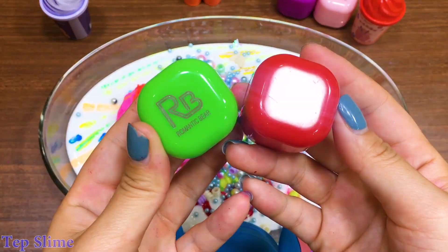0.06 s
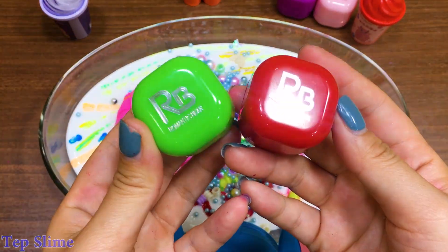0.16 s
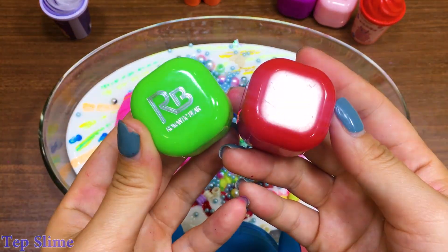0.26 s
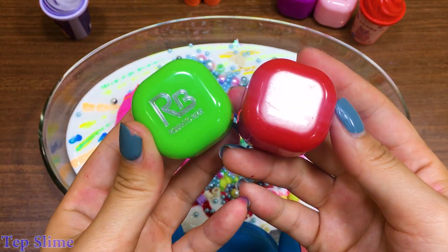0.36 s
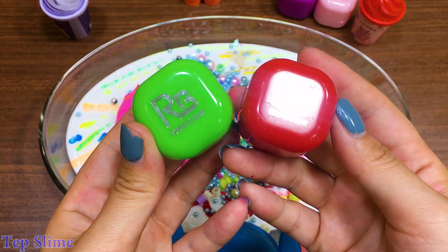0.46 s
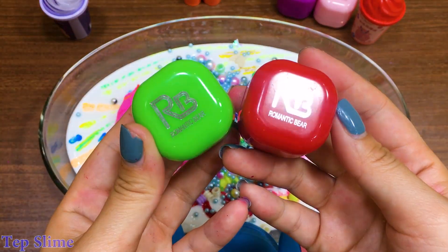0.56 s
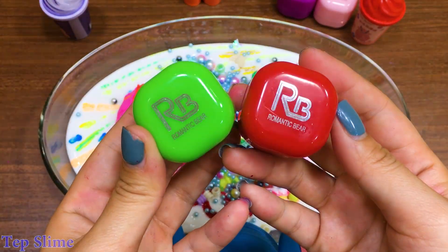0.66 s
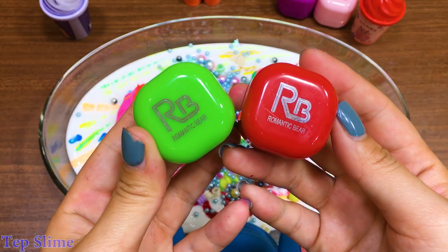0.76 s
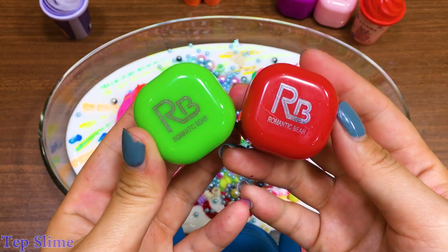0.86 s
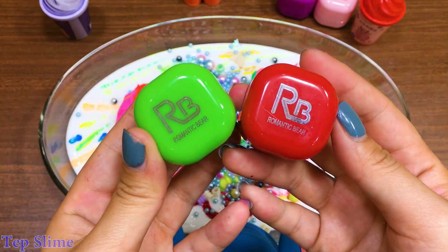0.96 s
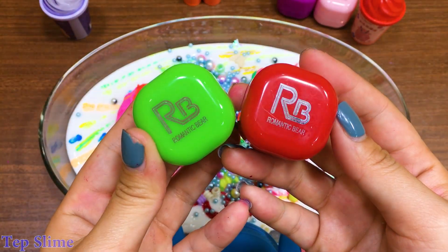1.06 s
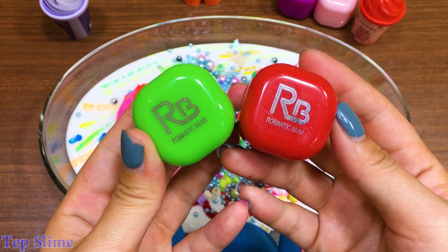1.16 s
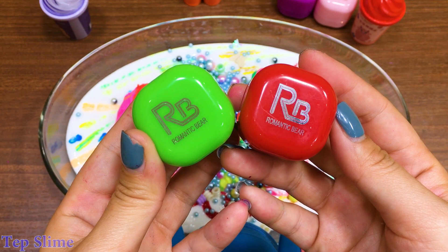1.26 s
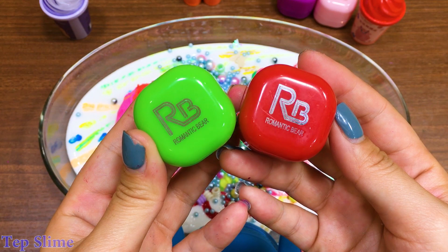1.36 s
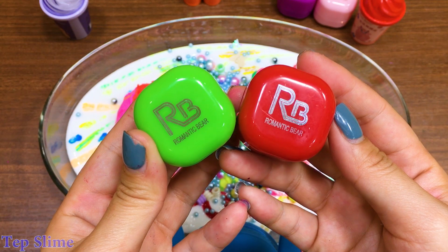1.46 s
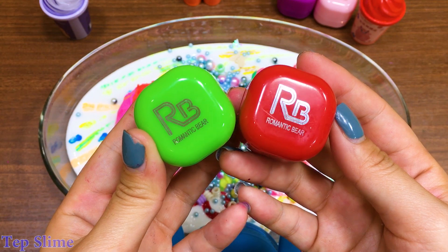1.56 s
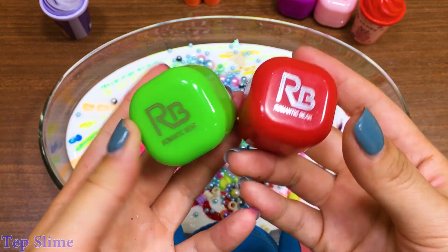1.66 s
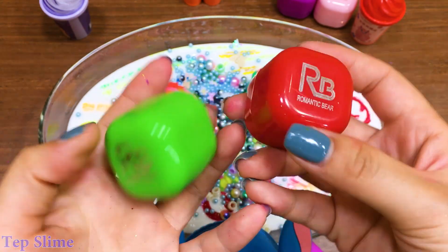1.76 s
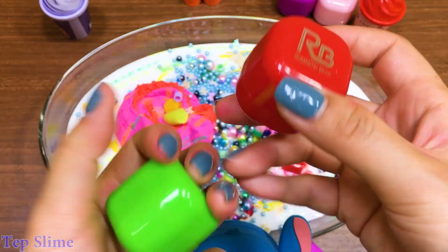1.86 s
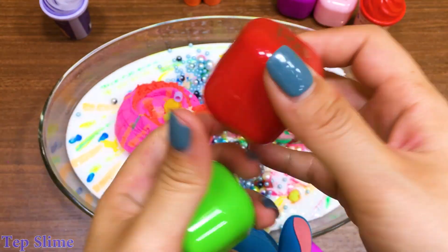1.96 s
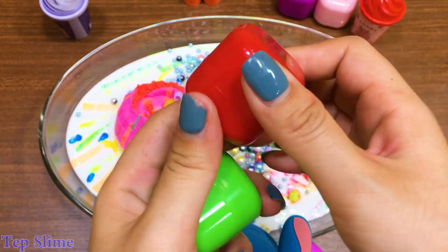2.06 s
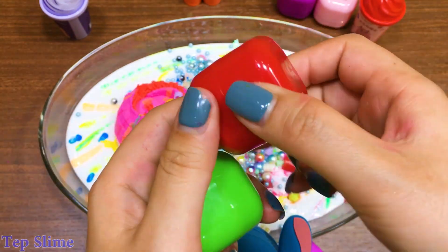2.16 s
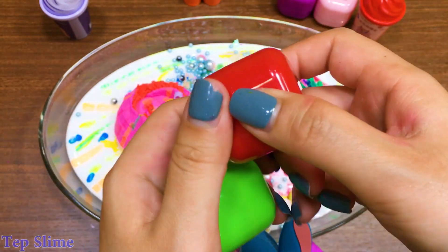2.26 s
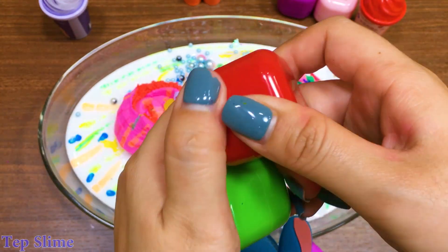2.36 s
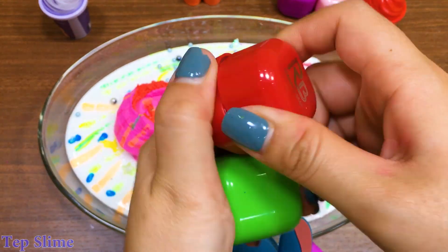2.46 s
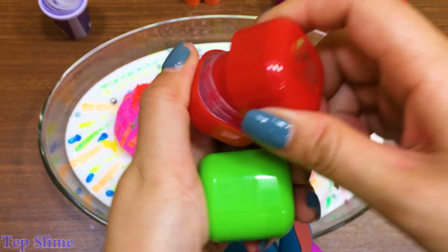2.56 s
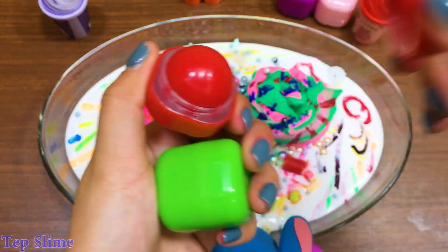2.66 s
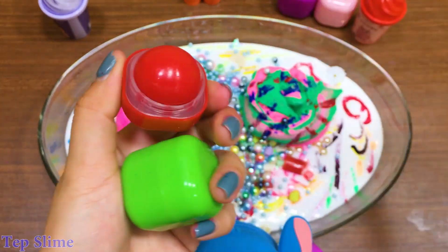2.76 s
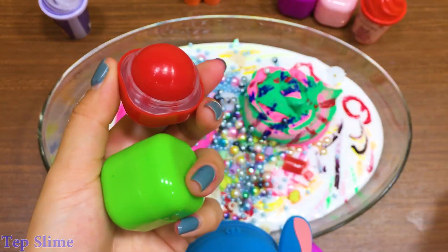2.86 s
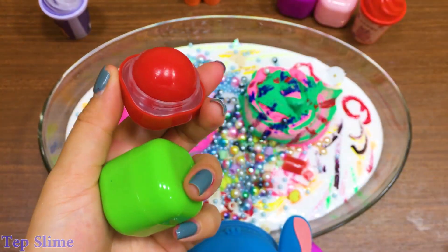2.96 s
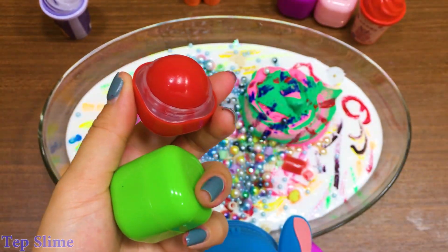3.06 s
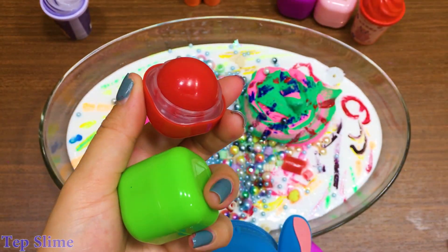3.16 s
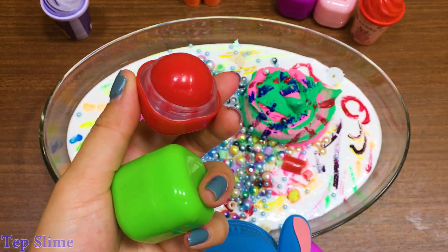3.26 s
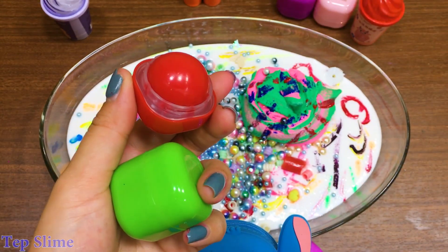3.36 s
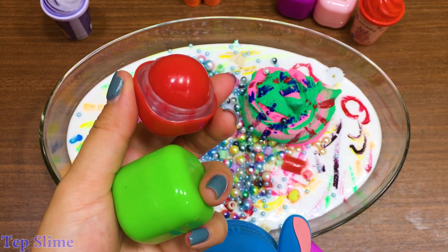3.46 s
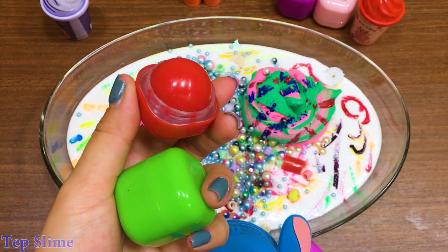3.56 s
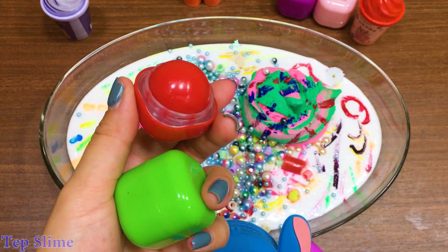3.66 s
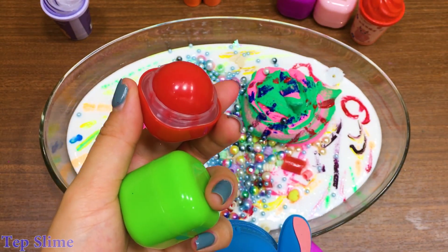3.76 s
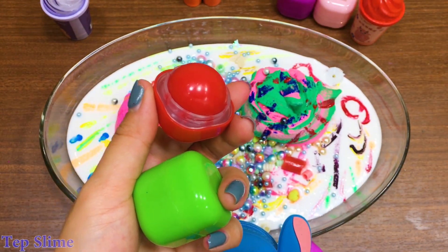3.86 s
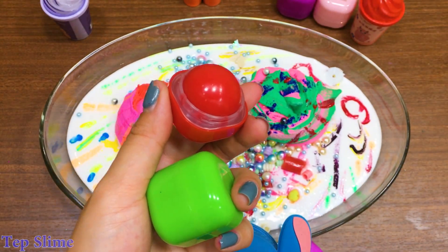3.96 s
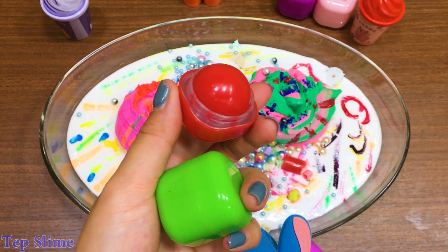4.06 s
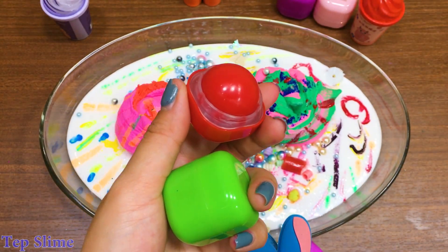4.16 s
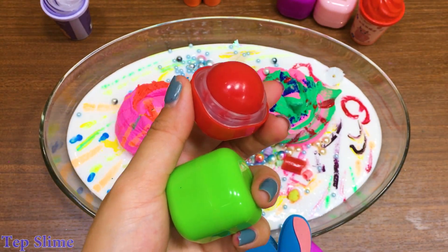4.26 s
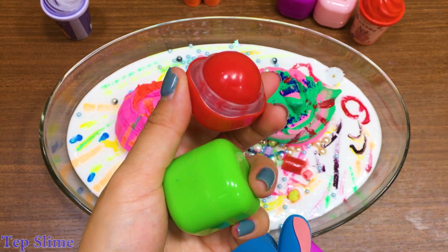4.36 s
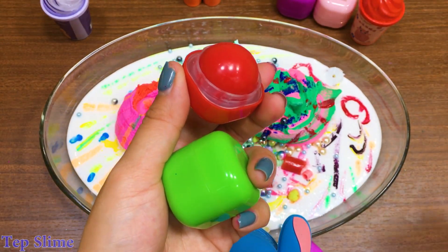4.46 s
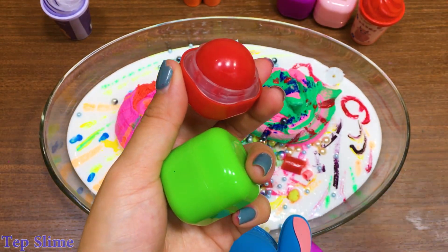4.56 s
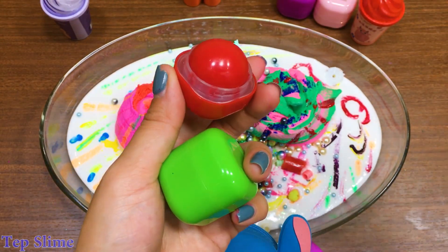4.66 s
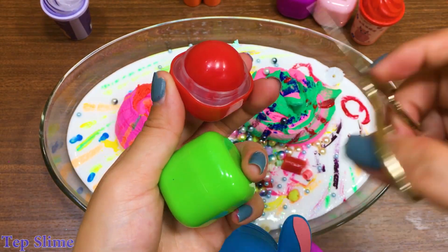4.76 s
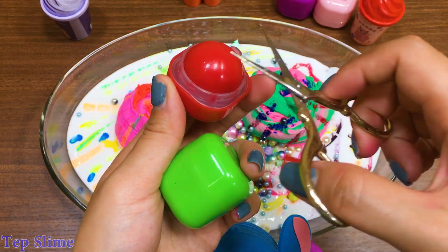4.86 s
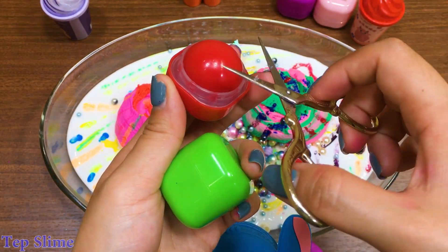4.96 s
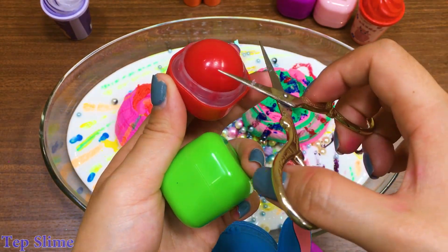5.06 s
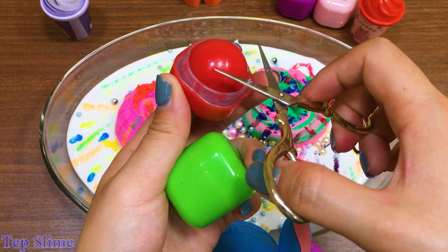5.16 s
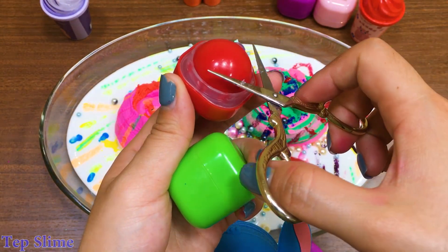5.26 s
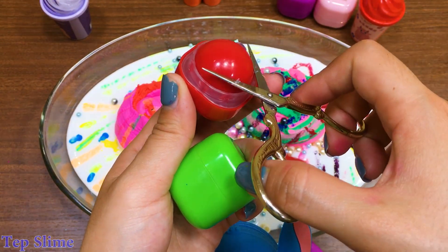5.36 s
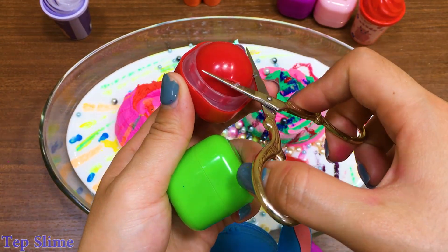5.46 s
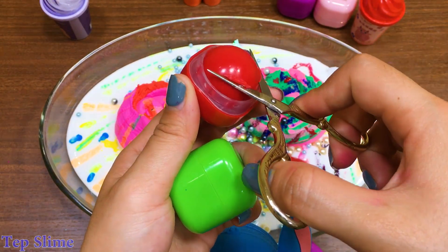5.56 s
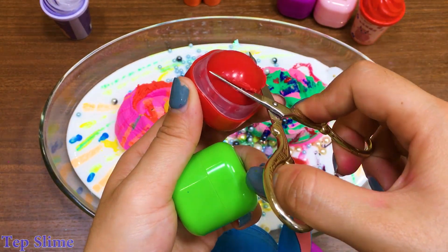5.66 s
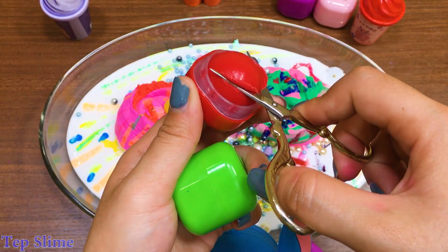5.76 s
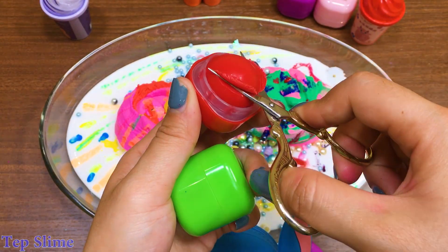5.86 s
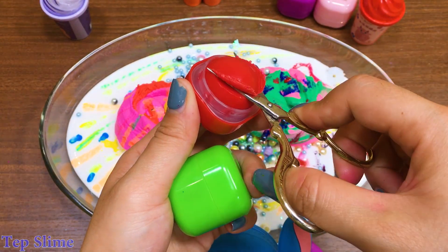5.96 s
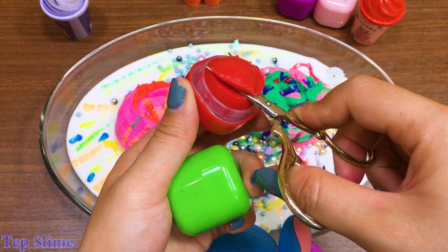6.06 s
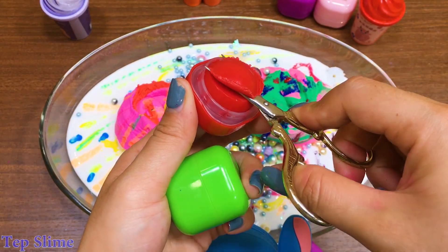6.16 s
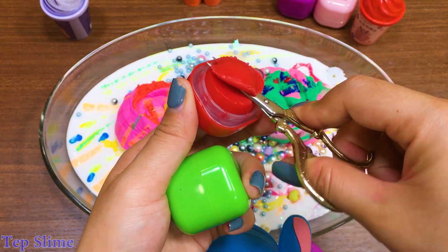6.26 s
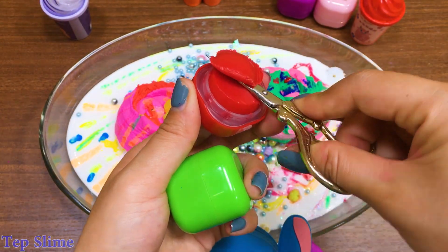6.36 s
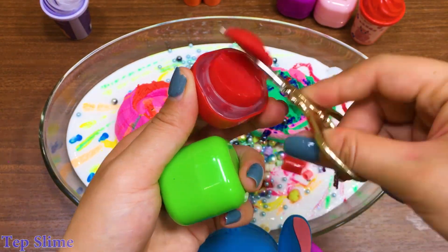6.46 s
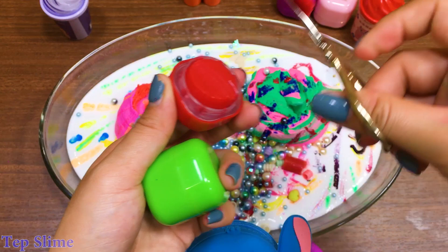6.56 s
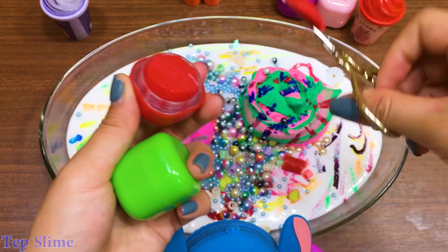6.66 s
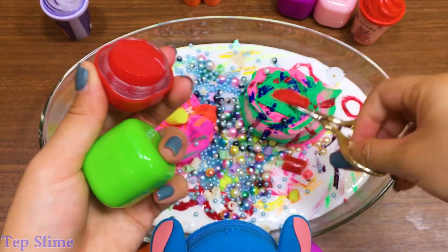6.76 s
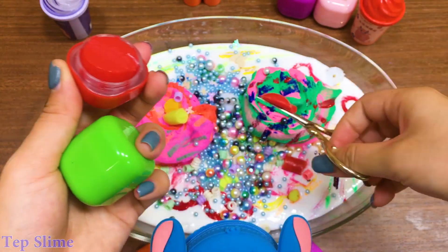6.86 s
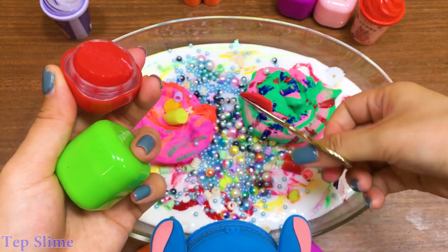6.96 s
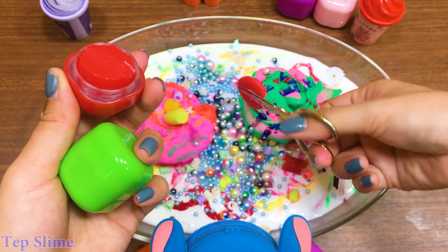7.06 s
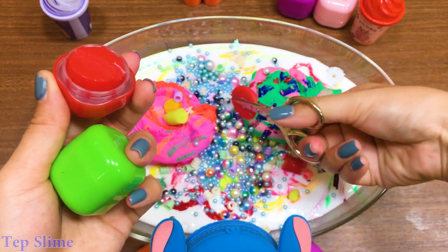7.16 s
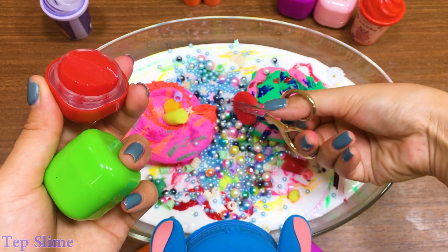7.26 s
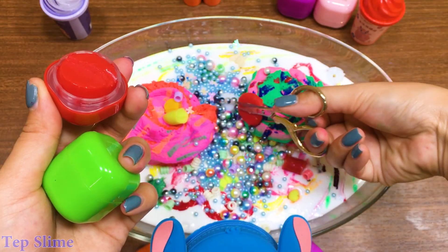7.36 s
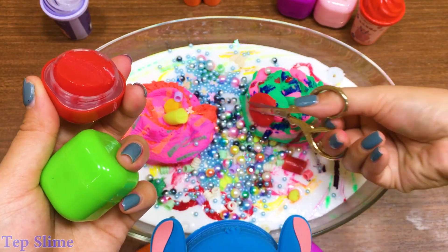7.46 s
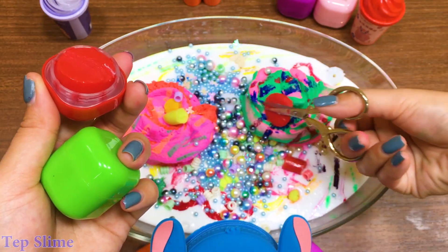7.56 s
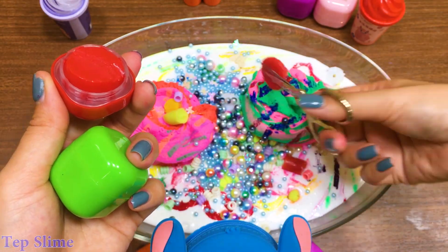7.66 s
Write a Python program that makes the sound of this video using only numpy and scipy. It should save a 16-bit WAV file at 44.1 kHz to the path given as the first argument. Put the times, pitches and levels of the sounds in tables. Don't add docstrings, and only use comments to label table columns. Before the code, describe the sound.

Very close, dry handling of a plastic lip balm pot: soft taps, a hard crack, a creaking twist and one loud pop. Then the cap knocks and settles on the wooden table, small scissors scrape, catch and ring brightly, and after a pause the blades click shut through soft wax. Tiny ticks finish it. Low outside rumble and constant microphone hiss fill the long gaps; the small room adds little echo.

```python
import sys
import numpy as np
from scipy import signal
from scipy.fft import rfft, irfft, next_fast_len
from scipy.io import wavfile
from scipy.ndimage import map_coordinates

SR = 44100
rng = np.random.default_rng(int(sys.argv[2]) if len(sys.argv) > 2 else 0)


def store_pcm(level_fs):
    pcm = np.round(np.clip(level_fs, -1, 1) * 32767).astype(np.int16)
    wavfile.write(sys.argv[1], SR, np.atleast_2d(pcm).T)


def invert_db(x):
    u = np.asarray(x, float) / 20
    return 10 ** u


N = 339525
TOP_HZ = 15750

# (time [s], strength [dB])
TRAFFIC = [(0, -65), (.7, -65), (1.1, -66.5), (2.2, -67), (2.74, -65), (3.9, -67.5), (4.6, -66.5),
           (5.3, -65), (5.9, -67), (6.7, -65), (7.7, -65)]
# (frequency [Hz], level [dB per Hz])
DEEP = [(15, -48), (25, -17.5), (38, -8.5), (59, 4.5), (82, -3.5), (115, 1.5), (141, -9.5)]
HUM = [(150, -9.5), (219, -9), (293, -14), (500, -18.5), (600, -23), (1150, -30), (1560, -58.5),
       (2640, -120)]
# (frequency [Hz], level [dB per Hz])
HISS = [(530, -31), (900, -11), (967, -5.5), (1170, -2.5), (3000, -4), (4450, -5), (9790, -7),
        (15600, -10.5)]
# (frequency [Hz], width [Hz], depth [dB])
HISS_DIPS = [(3024, 280, -3), (5420, 395.9, -3.5), (8354, 380, -2.5), (11456, 547.8, -4)]
# (frequency [Hz], t60 [s])
ROOM = [(300, 0.3), (2000, .16), (6000, 0.02), (14000, 0.067)]

# (time [s], peak [dB], lows over mids [dB], highs over mids [dB])
TAPS = [(1.6772, -54.5, -14.5, -14.5), (2.1851, -56, -12.5, -12), (2.2677, -56.5, -11, 1.5),
        (2.3428, -40.5, -13.5, 8), (2.3943, -45.5, -6.5, -2.5), (2.617, -34.5, -26, -4.5),
        (2.6201, -37.5, 3, -12), (2.6577, -48.5, -0.5, 4.5), (2.8029, -46.5, -3.5, -3.5),
        (2.8186, -28.5, -8, -3.5), (2.8366, -34, -9.5, 4), (3.0289, -39.5, -10, 15)]
# (frequency [Hz], level [dB], t60 [s])
POT = [(503, -9, 0.01089), (806.93, 0, 0.0091), (1075.2, 2.5, 0.012), (1480, 3.5, .006),
       (2017, -0.5, 0.0096), (2530, -4.5, 0.0066), (3094.8, 1, 0.0076), (3692, 1.5, 0.0039),
       (4450, 0, 0.00545), (7390, 1, 0.004), (8660, -3.5, 0.0054), (10101, -2.5, .0025), (13100, -3, .003),
       (15500, -3, .002)]
# (start [s], peak time [s], end [s], peak [dB], highs [dB])
FINGERS = [
    (2.03, 2.052, 2.095, -76, 8),
    (2.07, 2.095, 2.109, -68, -1),
    (2.135, 2.155, 2.175, -73, 4),
    (2.19, 2.225, 2.242, -68, -4),
    (2.96, 3.025, 3.03, -79, 10),
    (6.83, 6.855, 6.87, -75, 0),
    (7.03, 7.08, 7.12, -81.5, 7),
]
# (frequency [Hz], width [Hz], level [dB])
SKIN_LOW = [(3690, 1250, -0.47), (5030, 470, -1.2)]
SKIN_HIGH = [(7060, 2192, 0.16), (14447, 1800, -1.2)]
# (start [s], peak time [s], end [s], peak [dB])
CREAK = [
    (2.505, 2.522, 2.59, -66.5),
    (2.538, 2.55, 2.64, -63.5),
    (2.58, 2.62, 2.72, -66),
    (2.72, 2.732, 2.81, -56),
]
# (frequency [Hz], width [Hz], level [dB])
THREAD = [(3400, 900, 0)]
# (time [s], peak [dB])
CATCHES = [
    (2.6448, -53.5),
    (2.6707, -46),
    (2.6739, -45),
    (2.6776, -43),
    (2.6827, -38.5),
    (2.6904, -32),
    (2.7063, -37),
    (2.7147, -50.5),
    (2.7194, -36.5),
]
# (time [s], peak [dB], lows over mids [dB], highs over mids [dB])
SNAPS = [
    (2.5314, -17.5, -9, -12.5),
    (2.5351, -28.5, -5.5, -15),
    (2.537, -37.5, -13, -15),
]
# (time [s], peak [dB], lows over mids [dB])
RELEASE = [
    (2.7336, -29, -4),
    (2.7349, -21, -4),
    (2.7358, -4, 0),
    (2.7377, -12, 0),
    (2.7402, -25, 12),
]
# (frequency [Hz], level [dB], t60 [s])
SHELL = [(211.45, -28, 0.023), (432, -25.5, .012), (820, -15.5, .006), (1144, -11, 0.0038),
         (1550, -7.5, .005), (2100, -1.5, .004), (2904.3, 0, 0.0049), (3620, -3, 0.005),
         (4580, -2.5, 0.0067), (7189, -15.5, 0.0032), (8626, -8.5, 0.0054), (10890, -11.5, .003),
         (13180, -9.5, 0.0023), (15153, -10, .002)]
# (start [s], peak time [s], end [s], peak [dB], highs [dB])
CAP_SLIDE = [
    (2.741, 2.743, 2.756, -43, -7),
    (2.745, 2.752, 2.82, -54, -6),
    (2.8155, 2.818, 2.836, -42, -7),
    (2.822, 2.836, 2.848, -51, -3),
]
# (frequency [Hz], width [Hz], level [dB])
SLIDE_LOW = [(199.53, 280, -0.5), (1090.3, 600, -4), (2100, 800, -2.5), (3240, 900, -3.5),
             (4600, 900, -2.5)]
SLIDE_HIGH = [(6900, 1800, -2.5), (8982, 280, 1.5), (10900, 2000, -12.5), (14044, 2500, -8.5)]

# (time [s], peak [dB], lows over mids [dB], highs over mids [dB])
LANDING = [
    (3.2993, -26, 12.5, 10),
    (3.3023, -18, -2, -15.5),
    (3.3036, -27, -6, -18.5),
    (3.3075, -31.5, -12.5, -25),
    (3.3135, -31, 10.5, -14),
    (3.3221, -45, -10.5, -21.5),
    (3.4048, -41, 7, -9.5),
]
# (frequency [Hz], level [dB], t60 [s])
CAP = [(420, -5, 0.025), (606, -8.5, 0.0457), (895, -12, 0.02), (1201, 3, 0.031), (1553, -4.5, 0.0236),
       (1777, 6.5, 0.0114), (2190, -8.5, 0.028), (2530, -2.5, 0.0332), (3856, 0.5, 0.0104),
       (5100, 0, 0.0101), (8740, 5.5, 0.00745), (10850, -5.5, 0.005), (13200, -1, .004),
       (15452, -4.5, 0.00456)]
# (start [s], peak time [s], end [s], peak [dB], highs [dB])
SETTLE = [
    (3.312, 3.315, 3.35, -43.5, -6),
    (3.318, 3.325, 3.456, -58, 2),
    (3.39, 3.406, 3.422, -52.5, -14.5),
    (3.422, 3.438, 3.473, -51.5, -6),
]
# (time [s], peak [dB])
ROCKING = [
    (3.4263, -34),
    (3.4393, -36),
]
# (frequency [Hz], level [dB], t60 [s])
RIM = [(481, 3.5, 0.0122), (1094, 2, 0.026), (1500, -12, 0.015), (2420, -3, 0.013), (3330, 3.5, 0.0081),
       (4740, -3.5, 0.0467), (8820, 2, 0.0193)]
# (frequency [Hz], width [Hz], level [dB])
TABLE_LOW = [(343, 206, -5), (766, 124, -3), (1037, 61, 0.5), (1399.5, 167, -1.5)]
TABLE_HIGH = [(2034, 181, 2.5), (2333, 157.4, 5), (3254, 263.4, -2), (4130, 299.8, -3.5), (5100, 550, -12),
              (6210, 900, -15)]
# (frequency [Hz], width [Hz], level [dB])
SETTLE_HIGH = [(1840, 532.4, 0), (2575, 370, 0), (3890, 550, -7.5), (8670, 234, -13.5)]

# (start [s], peak time [s], end [s], peak [dB], highs [dB])
DRAG = [
    (3.84, 3.864, 3.9, -61, 1),
    (3.87, 3.908, 3.945, -59, -1.5),
    (4.161, 4.2, 4.31, -50, 5),
    (4.19, 4.262, 4.245, -48.5, 7),
    (4.262, 4.269, 4.273, -43.5, 5.5),
    (4.265, 4.272, 4.33, -47, -7),
]
# (time [s], peak [dB], lows over mids [dB])
STUTTER = [(3.8615, -52.5, -5), (3.8788, -46, -11.5), (3.8819, -37.5, -22.5), (3.8917, -40.5, -11),
           (3.8947, -46.5, -3.5), (3.9077, -49.5, -5.5), (4.1674, -37, -19.5), (4.1705, -36, -24.5),
           (4.1974, -37.5, -11), (4.222, -46, -12), (4.2265, -33, -21.5), (4.2295, -28.5, -9.5),
           (4.2335, -31.5, -19), (4.2377, -29.5, -14), (4.2435, -33.5, -3), (4.2523, -38, -5),
           (4.2542, -29, -5.5), (4.2564, -30.5, -18.5), (4.2593, -27.5, -9.5)]
# (frequency [Hz], level [dB], t60 [s])
WOOD = [(716, 6.5, 0.0108), (1106, -6.5, 0.019), (2220, 4.5, 0.0066), (2994, -3.5, 0.0082),
        (3507, 3, 0.00824), (4370, -2, 0.0104), (5070, -6.5, 0.00667), (6760, 3.5, 0.0037),
        (9897, -9, 0.0038)]
# (start [s], peak time [s], end [s], peak [dB], highs [dB])
LIFT = [
    (4.295, 4.315, 4.355, -53.5, -20),
    (4.32, 4.358, 4.41, -51.5, -26.5),
    (4.335, 4.356, 4.375, -55, -4.5),
    (4.385, 4.392, 4.44, -68.5, -18),
    (4.39, 4.422, 4.434, -74.5, 11),
]
# (frequency [Hz], width [Hz], level [dB])
LIFT_LOW = [(500, 690, -9.5), (1203, 204, 11.5)]
LIFT_HIGH = [(3320, 2100, -1.5), (5290, 400, 2)]
# (start [s], peak time [s], end [s], peak [dB])
SQUEAL = [
    (4.17, 4.24, 4.265, -62.5),
    (4.27, 4.276, 4.31, -60),
]
WHISTLE = [
    (4.385, 4.415, 4.435, -66.5),
]
# (frequency [Hz], width [Hz], level [dB])
BLADES = [(9870, 500, 1.5), (12300, 200, -5.5), (12700, 780, -1)]
# (time [s], peak [dB])
CLINKS = [
    (4.2498, -51),
    (4.2621, -21),
    (4.2636, -23),
    (4.2653, -22.5),
    (4.2691, -40),
]
# (frequency [Hz], level [dB], t60 [s])
STEEL = [(2266, 3, 0.0055), (4412, -4.5, 0.0116), (5860, 0.5, 0.0036), (7680, -3, 0.0042),
         (9940, -1.5, 0.0078), (12030, -5.5, 0.0098), (12910, -2, 0.0174), (12950, -24, 0.165),
         (15110, -7.5, 0.0063)]

# (time [s], peak [dB], lows over mids [dB], highs over mids [dB])
SNIPS = [
    (4.8876, -48, -13.5, 18.5),
    (4.9265, -57, 0.5, 16.5),
    (4.932, -51.5, -16.5, 4.5),
    (4.9345, -45.5, -12, 18.5),
    (4.9367, -32.5, -11, 22.5),
    (4.938, -34, -13.5, 12.5),
]
# (frequency [Hz], level [dB], t60 [s])
HELD = [(1192.8, 2, 0.0031), (2360, 1, 0.002586), (4072, -3, 0.01965), (5561, -4, 0.0025),
        (7520, -9, 0.00555), (10550, -16.5, 0.0038), (12580, -1.5, 0.00474), (12690, -17, 0.0036),
        (14500, -14.5, 0.0068)]
# (start [s], peak time [s], end [s], peak [dB])
PIVOT = [
    (6.535, 6.56, 6.64, -68.5),
    (6.574, 6.58, 6.584, -53.5),
    (6.58, 6.587, 6.612, -61),
    (6.6, 6.62, 6.65, -69),
]
# (frequency [Hz], width [Hz], level [dB])
HINGE = [(3900, 230, 0)]
# (time [s], peak [dB], lows over mids [dB], highs over mids [dB])
CUTS = [
    (6.5455, -59, -5, 14),
    (6.5856, -47, -3.5, -4),
    (6.6141, -39, -12.5, 8.5),
    (6.6146, -23.5, -7, 5.5),
    (6.6157, -30.5, -16, 1.5),
]
# (frequency [Hz], level [dB], t60 [s])
SHUT = [(1201, 0, 0.00376), (2330, -5.5, 0.0022), (3962, 1.5, 0.0104), (5460, -2.5, 0.0036),
        (7040, -1.5, 0.0031), (10010, -2, 0.0038), (11240, -2.5, 0.0044), (12460, -1, 0.0043),
        (14870, -0.5, 0.0039)]
# (time [s], peak [dB], highs over mids [dB])
TICKS = [
    (7.6099, -48, 0),
    (7.6146, -62.5, 12),
    (7.6452, -52.5, 6.5),
    (7.6507, -49.5, 9),
    (7.6523, -43.5, 7),
    (7.6563, -50.5, -6.5),
    (7.6675, -40, 17),
    (7.6718, -44, 21),
    (7.6795, -61, 10.5),
]
# (frequency [Hz], level [dB], t60 [s])
WAX = [(2000, 1.5, .003), (3950, 4, 0.00226), (6500, 0.5, 0.002), (8900, 2.5, 0.0027), (11005, -1, 0.0023),
       (12940, 1.5, 0.00214), (14940, -5, .002)]


def unit(x):
    return x / np.sqrt(np.mean(x ** 2) + 1e-20)


def along(points, hz):
    f, value = np.transpose(points)
    return np.interp(np.log(hz + 1), np.log(f + 1), value)


def filtered(x, response):
    size = next_fast_len(len(x) + 8192)
    spectrum = rfft(x, size) * response(np.fft.rfftfreq(size, 1 / SR))
    return irfft(spectrum, size)[:len(x)]


def resonances(modes):
    def response(f):
        total = 0
        for k, (centre, width, db) in enumerate(modes):
            damping = 1j * f * width
            total = total + (-1) ** k * invert_db(db) * damping / (centre * centre - f * f + damping)
        return total
    return response


def shaded(rows, lows_db, highs_db):
    return [(s, db, *(own[0] if part is None else part for part in (lows_db, highs_db))) for s, db, *own in rows]


def strike(events, modes, touch_s, ring):
    out = np.zeros(N + SR)
    t = np.arange(SR // 10) / SR
    hz, level, t60 = np.transpose(modes)[:, :, None]
    sides = (-1) ** np.arange(len(modes))[:, None]
    onset = (1 - np.exp(-t / touch_s)) ** 2
    for s, db, lows_db, highs_db in events:
        chance = rng.standard_normal((2, len(modes), 1))
        tilt_db = along([(1300, lows_db), (2200, 0.0018), (5300, 0.00126), (6500, highs_db)], hz)
        scatter_db = 1.5 * chance[0]
        pitch = hz * (1 + chance[1] / 120)
        decay = invert_db(level + tilt_db + scatter_db - 60 * t / (ring * t60))
        tones = sides * decay * np.sin(2 * np.pi * pitch * t)
        chatter = invert_db(-19 - 60 * t[:300] / .004) * rng.standard_normal(300)
        chatter[0] = 1
        sound = signal.fftconvolve(onset * tones.sum(axis=0), chatter)[:len(t)]
        out[round(s * SR):][:len(t)] += invert_db(db) * sound / np.abs(sound).max()
    return out[:N]


def rub(strokes, low, high, spiky_db, fade_db):
    out = np.zeros(N)
    for start, peak, end, db, *highs_db in strokes:
        i = np.arange(round(start * SR), round(end * SR))
        slips = np.minimum(rng.exponential(size=len(i) // 24 + 1), 4)
        slips = np.repeat(slips, 24)[:len(i)]
        grains = invert_db(spiky_db * slips) * rng.standard_normal(len(i))
        sound = unit(filtered(grains, resonances(low)))
        if high:
            sound = sound + invert_db(highs_db[0]) * unit(filtered(grains, resonances(high)))
        swell_db = db - fade_db * np.interp(i / SR, [start, peak, end], [1, 0, 1])
        out[i] += invert_db(swell_db) * sound * signal.windows.tukey(len(i), .08)
    return filtered(out, lambda hz: hz < TOP_HZ)


def rumble():
    t = np.arange(N) / SR
    strength_db = np.interp(t, *np.transpose(TRAFFIC))
    mean_db = strength_db.mean()
    hum_db = -1.5 + mean_db + .6 * (strength_db - mean_db)
    lumps = [map_coordinates(rng.standard_normal(round(N / SR * 8) + 4), [t * 8]) for part in range(2)]
    deep = unit(filtered(rng.standard_normal(N), lambda hz: invert_db(along(DEEP, hz)) * (hz < 150)))
    hum = unit(filtered(rng.standard_normal(N), lambda hz: invert_db(along(HUM, hz)) * (hz >= 150)))
    return invert_db(-1.5 + strength_db + 1.4 * lumps[0]) * deep + invert_db(hum_db + 1.173 * lumps[1]) * hum


def microphone_hiss():
    def response(hz):
        dips_db = sum(db * np.exp(-((hz - centre) / width) ** 2) for centre, width, db in HISS_DIPS)
        return invert_db(along(HISS, hz) + dips_db) * (hz < TOP_HZ)
    return invert_db(-72.5) * unit(filtered(rng.standard_normal(N), response))


def pot_handling():
    taps = strike(TAPS, POT, touch_s=0.000066, ring=0.53)
    return taps + rub(FINGERS, SKIN_LOW, SKIN_HIGH, spiky_db=4.0, fade_db=8.5)


def room(x):
    hz, t, z = signal.stft(rng.standard_normal(SR // 3), SR, nperseg=256)
    decay = invert_db(-60 * t / along(ROOM, hz)[:, None])
    tail = signal.istft(z * decay, SR, nperseg=256)[1]
    delayed = np.pad(x, (150, 0))
    return signal.fftconvolve(delayed, tail / np.linalg.norm(tail))[:N]


def cap_twist():
    creak = rub(CREAK, THREAD, None, spiky_db=4.0, fade_db=12)
    return creak + strike(shaded(CATCHES, lows_db=-15.5, highs_db=-16), POT, touch_s=0.000066, ring=.88)


def seal_snap():
    return strike(SNAPS, POT, touch_s=0.000066, ring=0.79)


def cap_release():
    pop = strike(shaded(RELEASE, lows_db=None, highs_db=-1), SHELL, touch_s=.00007, ring=.9)
    return pop + rub(CAP_SLIDE, SLIDE_LOW, SLIDE_HIGH, spiky_db=1.5, fade_db=14.5)


def cap_on_table():
    landing = strike(LANDING, CAP, touch_s=0.000098, ring=0.762)
    rocking = strike(shaded(ROCKING, lows_db=-1.0, highs_db=-15.5), RIM, touch_s=0.00008, ring=0.57)
    return landing + rocking + rub(SETTLE, TABLE_LOW, SETTLE_HIGH, spiky_db=-0.5, fade_db=28.5)


def scissors_drag():
    scrape = rub(DRAG, TABLE_LOW, TABLE_HIGH, spiky_db=2.5, fade_db=13.5)
    lift = rub(LIFT, LIFT_LOW, LIFT_HIGH, spiky_db=-5.2, fade_db=16.5)
    return scrape + lift + strike(shaded(STUTTER, lows_db=None, highs_db=-19), WOOD, touch_s=0.000076, ring=0.78)


def loose_blades():
    squeal = rub(SQUEAL, BLADES, None, spiky_db=2.95, fade_db=21)
    whistle = rub(WHISTLE, BLADES[:1], None, spiky_db=5.0, fade_db=12.5)
    return squeal + whistle + strike(shaded(CLINKS, lows_db=-5, highs_db=7.5), STEEL, touch_s=0.000114, ring=0.485)


def blades_opening():
    return strike(SNIPS, HELD, touch_s=0.00013, ring=1.196)


def wax_cut():
    squeak = rub(PIVOT, HINGE, None, spiky_db=5.5, fade_db=17.5)
    return squeak + strike(CUTS, SHUT, touch_s=0.00014, ring=1.0)


def wax_ticks():
    return strike(shaded(TICKS, lows_db=-9.5, highs_db=None), WAX, touch_s=0.000236, ring=0.58)


def scene():
    pot = pot_handling() + cap_twist() + seal_snap() + cap_release()
    near = pot + loose_blades() + blades_opening() + wax_cut() + wax_ticks()
    far = cap_on_table()
    drag = scissors_drag()
    wet = room(invert_db(-23.5) * near + invert_db(-11) * far + invert_db(-19) * drag)
    return (near + far + drag + wet + rumble() + microphone_hiss())[None]


def low_pass(x):
    return signal.sosfilt(signal.butter(12, 17020, fs=SR, output="sos"), x)


def record(dry):
    bass_cut = signal.butter(3, 40, "highpass", fs=SR, output="sos")
    top_cut = signal.butter(8, 16400, fs=SR, output="sos")
    mix = signal.sosfilt(top_cut, signal.sosfilt(bass_cut, dry))
    return low_pass(mix)


dry = scene()
out = record(dry)
store_pcm(out)
```